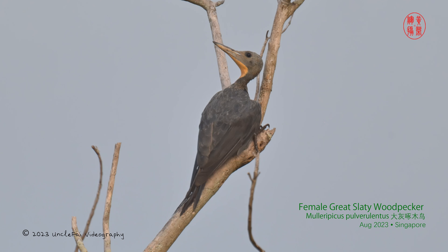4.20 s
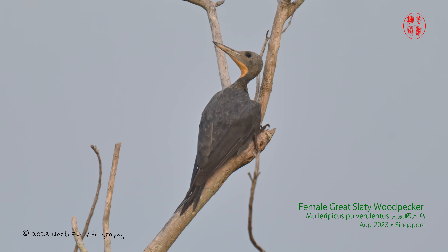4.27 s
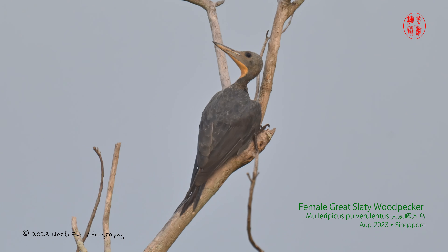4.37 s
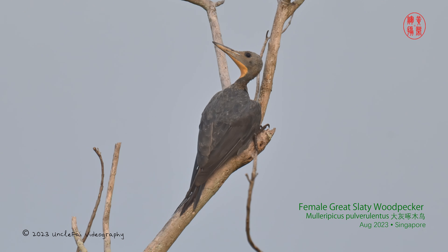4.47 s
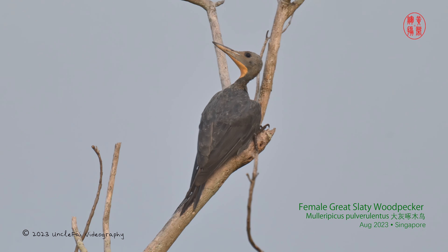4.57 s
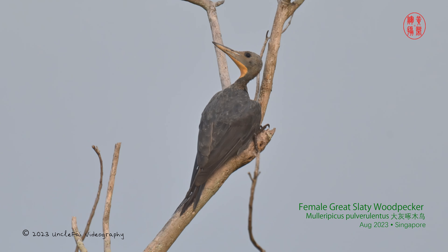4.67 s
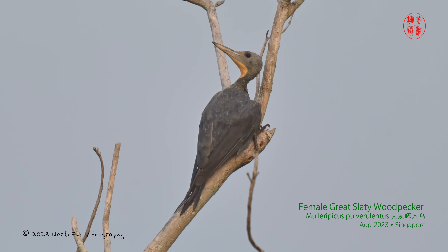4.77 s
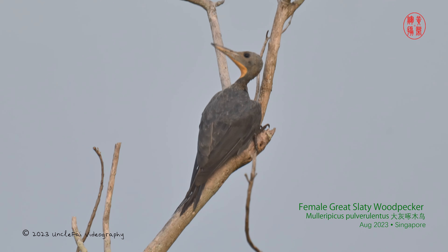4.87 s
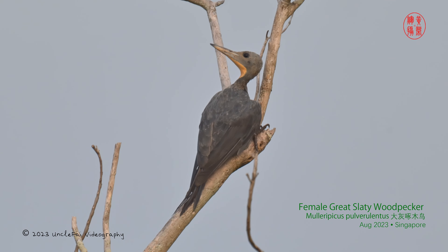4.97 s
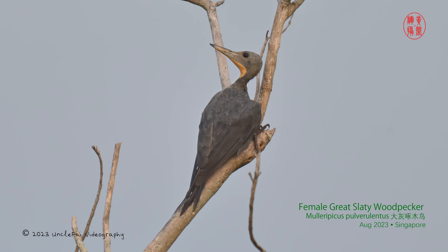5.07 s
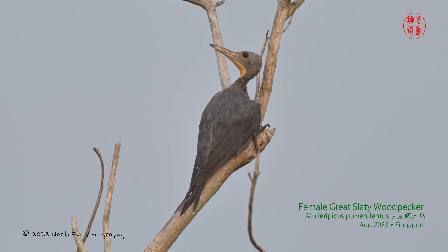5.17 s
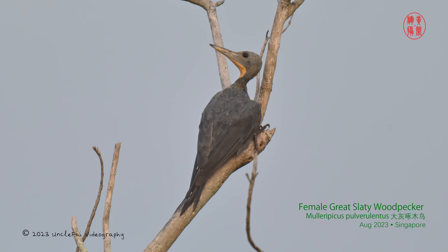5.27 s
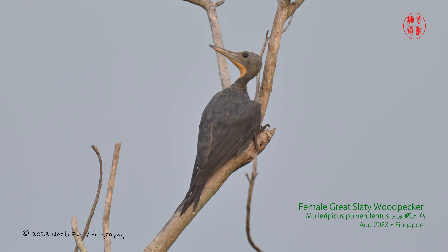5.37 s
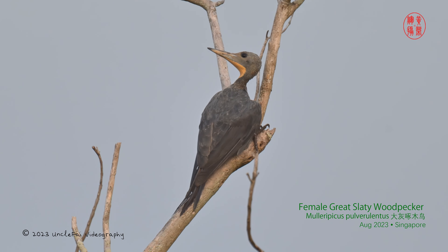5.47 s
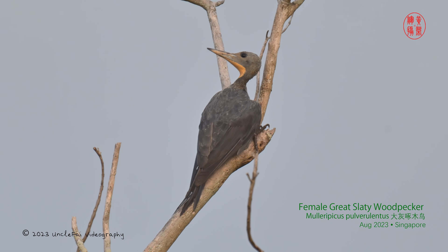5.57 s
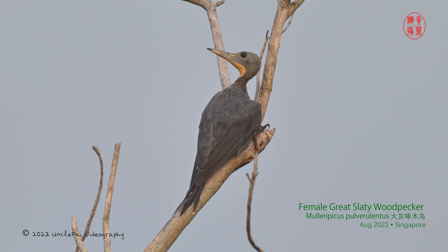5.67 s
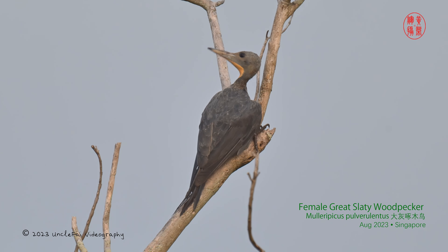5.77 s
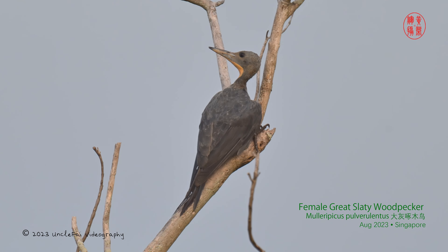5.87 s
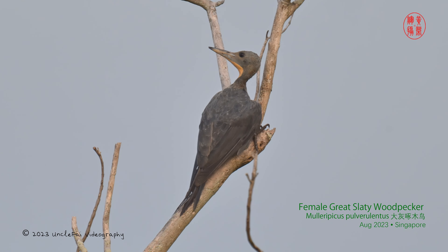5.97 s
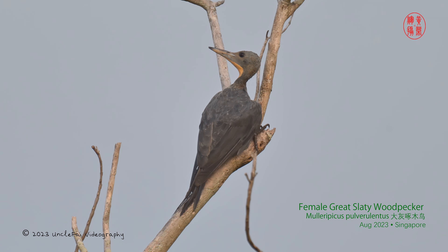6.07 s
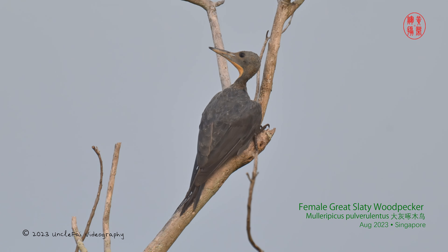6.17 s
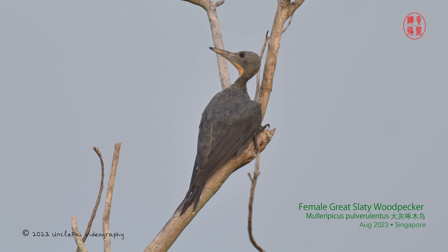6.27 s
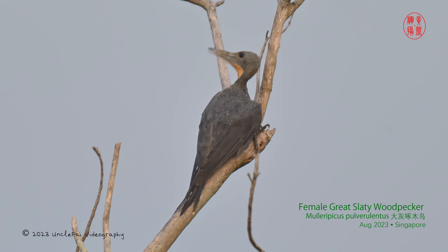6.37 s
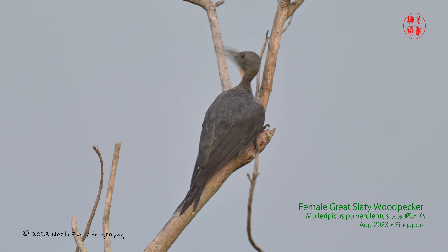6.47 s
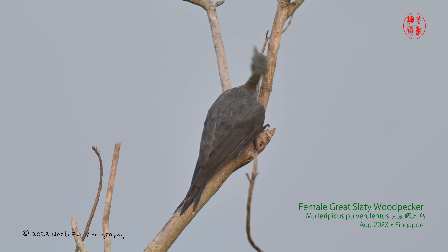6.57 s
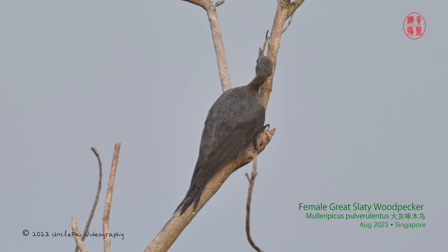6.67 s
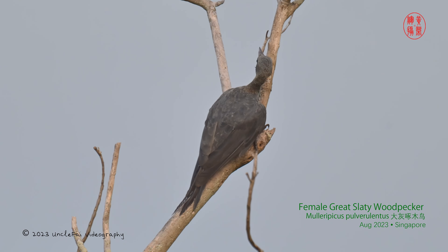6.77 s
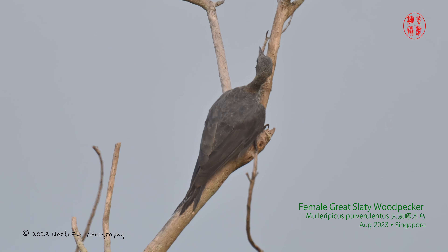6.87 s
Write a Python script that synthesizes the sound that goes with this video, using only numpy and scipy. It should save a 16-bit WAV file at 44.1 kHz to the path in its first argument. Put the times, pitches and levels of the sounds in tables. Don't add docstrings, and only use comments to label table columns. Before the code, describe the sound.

From 0 to 7 seconds, a humid forest edge hums in wide stereo: deep distant traffic rumble, a faint low engine hum, and a thin, high cicada drone in two bands. Katydids make short dry rasps several times a second, brighter on the left, fainter on the right. Leaves rustle in brief flickers, with small drips and twig ticks mostly right of centre, including snaps near 1.5 s. A blurred far call fades at the start. At 1.95-2.35 s a woodpecker gives four quick arched, nasal whinny notes, with a leafy tick among them. Soft distant whistles follow: a falling slur at 2.5 s, a low arch at 4 s, another slur at 5 s. A sharp twig crack comes at 4.17 s, knocks and snaps at 4.66 s. Another blurred call swells near 5.65 s. From 6.56 s four more whinny notes close the scene, trailing a short scattered echo.

```python
import sys
import numpy as np
from scipy import signal
from scipy.io import wavfile
from scipy.ndimage import uniform_filter1d

SR = 44100
rng = np.random.default_rng(int(sys.argv[2]) if len(sys.argv) > 2 else 0)


def wav_record(signal):
    frames = np.transpose(np.atleast_2d(signal))
    bounded = np.clip(frames, -1, 1)
    quanta = np.round(bounded * 32767).astype(np.int16)
    wavfile.write(sys.argv[1], SR, quanta)


def boost(x):
    u = np.asarray(x, float) / 20
    return 10 ** u


N = 305172

PORT_LAG_S = .00013


def evened(x):
    return x / np.sqrt(np.mean(x ** 2) + 1e-20)


def read(points, hz):
    f, value = np.transpose(points)
    return np.interp(np.log(hz + 1), np.log(f + 1), value)


def along(rows):
    s, value = np.transpose(rows)
    return np.interp(np.arange(N) / SR, s, value)


def add(mix, s, sound):
    part = mix[..., round(s * SR):][..., :sound.shape[-1]]
    part += sound[..., :part.shape[-1]]


def slow(count, size):
    once = uniform_filter1d(rng.standard_normal(count), size)
    return evened(uniform_filter1d(once, size))


def swell(peak_s, rise_s, fall_s):
    t = np.arange(N) / SR - peak_s
    return boost(-20 * (t / np.where(t < 0, rise_s, fall_s)) ** 2)


def sides(db):
    return boost([[db / 2], [-db / 2]])


def hiss(shape, same, lag_s, patchy_db):
    frames, hz = N // 256 + 5, np.fft.rfftfreq(1024, 1 / SR)
    a, b, c, d, patches = rng.standard_normal((frames, 513, 5)).T
    patches = uniform_filter1d(patches, size=24, axis=0)
    patches = evened(uniform_filter1d(patches, size=10, axis=1))
    same = np.clip(read(same, hz), -1, 1)[:, None]
    turn = 2 * np.pi * hz * lag_s * hz ** 2 / (hz ** 2 + 800 ** 2)
    right = a + 1j * b
    left = same * right * np.exp(-1j * turn)[:, None] + np.sqrt(1 - same ** 2) * (c + 1j * d)
    z = np.array([left, right]) * boost(read(shape, hz)[:, None] + patchy_db * patches)
    return evened(signal.istft(z, nperseg=1024, noverlap=768)[1][:, :N])


def air():
    # hz, level_db (per Hz)
    wash_colour = [(15, -36), (30, -14), (50, 4), (100, -0.5), (135, -5.5), (165, -15.5), (200, -14.5),
                   (370, -11.5), (600, -17), (950, -18), (1250, -25.5), (2000, -32), (3000, -34),
                   (4500, -29), (7500, -57)]
    # hz, likeness (share)
    wash_likeness = [(100, 1), (300, 1), (500, 0.99), (800, 0.92), (1100, 0.79), (1900, 0.36), (3500, 0.43),
                     (6000, 0.17)]
    hum_hz = 73.4 + .8 * slow(N, size=9000)
    hum = np.sin(2 * np.pi * np.cumsum(hum_hz) / SR) * (1 + .3 * slow(N, size=5000))
    wash_gain = boost(-43.5 + 0.13 * slow(N, size=8000))
    return wash_gain * hiss(wash_colour, wash_likeness, PORT_LAG_S, patchy_db=0.79) + boost(-50) * hum


def choir(shape, loudness, throbs, same, balance_db):
    beat = np.zeros(N)
    for hz, depth, wander_hz in throbs:
        beat += depth * np.sin(2 * np.pi * np.cumsum(hz + wander_hz * slow(N, size=3000)) / SR)
    drone = hiss(shape, [(1, same), (2, same)], lag_s=PORT_LAG_S, patchy_db=0.5)
    return boost(along(loudness)) * sides(balance_db) * evened(drone * (1 + np.clip(beat, -.9, 2)))


def cicadas():
    # hz, level_db
    low_colour, high_colour = [(4000, -89), (6000, -38), (6400, -26.5), (6750, -12.5), (7000, 0),
                               (7250, -3), (7440, 2), (7670, 1), (7850, -6), (8100, -7), (8450, -22),
                               (9500, -19.5), (12000, -83)], [(5000, -74), (8500, -18), (8750, -7.5), (9020, 0.5),
                                                  (9480, 4), (10000, -1), (11300, -17), (12800, -45),
                                                  (15800, -21)]
    # time_s, level_db
    low_loudness, high_loudness = [(0, -35.5), (7, -36)], [(0, -48.5), (1, -49), (2, -48.5), (2.6, -50),
                                                         (3.2, -47), (3.5, -50), (4.2, -47), (4.7, -51),
                                                         (5.3, -47), (5.8, -48.5), (7, -47.5)]
    # rate_hz, depth (share), wander_hz
    low_throbs, high_throbs = [(10.81, 0.072, 1.7), (69.3, 0.12, 9.75), (100, 0.04, 4.1), (151, 0.027, 2.7)], [(82, 0.21, 2.4), (175, 0.04, 5.1)]
    low = choir(low_colour, low_loudness, low_throbs, same=0.21, balance_db=0.8)
    high = choir(high_colour, high_loudness, high_throbs, same=0.12, balance_db=6.0)
    return boost(1.5) * (low + high)


def katydid(phrases, stroke_s, wing, lag_s, balance_db):
    strokes, stroke = np.zeros(N), signal.windows.hann(round(.025 * SR))
    for first, last, db in phrases:
        for s in np.arange(last, first, -stroke_s):
            stroke_db = db + 4.5 - 6.0 * np.exp(-(s - first) / 0.025)
            add(strokes, max(s - len(stroke) / SR / 2, 0), boost(stroke_db) * stroke)
    rasp = hiss(wing, [(1, .5), (2, .5)], lag_s, patchy_db=.7)
    return strokes * rasp * sides(balance_db)


def katydids():
    # first_stroke_s, last_stroke_s, level_db
    calls = [(0, .018, -52), (.2, .282, -52), (.5, 0.594, -49), (0.778, 0.826, -49), (1.03, 1.11, -52),
             (1.48, 1.533, -50), (2.39, 2.488, -56), (2.69, 2.748, -54), (2.9, 3.008, -53),
             (3.16, 3.242, -53), (3.4, 3.453, -51), (3.6, 3.706, -55), (3.84, 3.944, -52),
             (4.17, 4.273, -52), (4.41, 4.513, -51), (4.66, 4.744, -50), (4.88, 4.96, -51),
             (5.13, 5.207, -53), (5.43, 5.482, -51), (5.74, 5.792, -52), (6.362, 6.463, -51),
             (6.748, 6.795, -50)]
    # first_stroke_s, last_stroke_s
    answers = [(.08, .191), (.27, .374), (.7, .808), (.92, 1.03), (1.16, 1.272), (1.4, 1.506),
               (1.64, 1.749), (1.885, 1.991), (2.11, 2.216), (2.335, 2.442), (2.545, 2.652), (2.76, 2.864),
               (3.035, 3.14), (3.25, 3.356), (3.51, 3.616), (3.77, 3.875), (4.065, 4.173), (4.29, 4.393),
               (4.51, 4.588), (4.76, 4.843), (5.02, 5.106), (5.235, 5.319), (5.545, 5.629), (5.79, 5.87),
               (5.98, 6.032), (6.65, 6.7)]
    # hz, level_db
    call_wing, answer_wing = [(5000, -80), (8500, -30), (10000, -1), (11000, 0), (12000, -4), (13000, -8),
                              (14500, -7), (16000, -8)], [(5000, -80), (10000, -30), (11500, -5), (13000, -1), (14200, 0),
                                            (16000, -7)]
    answers = [(*span, -61) for span in answers]
    left = katydid(calls, .0235, call_wing, -PORT_LAG_S, balance_db=4)
    return left + katydid(answers, .0253, answer_wing, PORT_LAG_S, balance_db=-14)


def rustle():
    # peak_s, reach_s, bright_db, dull_db
    stirs = [(.24, 0.15, -56, -51.5), (.37, 0.14, -54, -51), (.69, .14, -60, -54), (.88, 0.16, -56, -50),
             (1.26, 0.2, -61, -60.5), (1.38, 0.065, -55, -49.5), (1.52, 0.21, -52, -50),
             (2.2, 0.26, -62, -52.5), (2.42, .18, -60, -56), (2.8, 0.26, -60, -57), (3.13, 0.9, -57, -53.5),
             (3.6, 0.16, -52.5, -52), (3.87, 0.3, -55, -53), (4.12, 0.22, -70, -55.5),
             (4.43, 0.24, -49.5, -51.5), (4.7, 0.37, -57, -53.5), (5.28, 0.5, -56, -56),
             (5.7, 0.22, -69, -58), (5.87, 0.34, -56, -52.5), (6.12, 0.2, -56, -51.5),
             (6.38, 0.32, -59, -56), (6.73, .17, -52.5, -48.5), (6.92, .2, -58, -50)]
    # hz, level_db
    bright_colour, dull_colour = [(5000, -80), (8500, -30), (10000, -8), (11500, 4.5), (12500, -3),
                                  (13500, -6.5), (16000, -16)], [(200, -68), (700, 7.5), (1500, 14.5), (2500, 12.5),
                                                  (4000, 15), (6000, 12), (8000, 10), (10000, -22),
                                                  (16000, -60)]
    crackle = boost(1.6 * slow(N, size=120))
    power = boost([[-61.5], [-74]]) ** 2 * np.ones((2, N))
    for s, reach, bright_db, dull_db in stirs:
        power += (boost([[bright_db], [dull_db]]) * swell(s, reach, reach)) ** 2
    loudness = np.sqrt(power)
    bright = loudness[0] * hiss(bright_colour, [(1, .4), (2, .4)], PORT_LAG_S, patchy_db=.6) * sides(-9)
    dull = loudness[1] * hiss(dull_colour, [(1000, .7), (3000, .65)], PORT_LAG_S, patchy_db=1.2) * sides(-3)
    return crackle * (bright + dull)


def ticks():
    # time_s, level_db, centre_hz, left_right_db
    drips = [
        (.215, -49, 730, 0),
        (1.6, -46, 1060, -9),
        (3.6, -51, 1700, -5),
        (4.82, -43, 625, -3),
    ]
    knocks = [
        (.877, -41, 1210, -12),
        (.897, -43, 600, -1),
        (4.664, -39, 900, -4),
        (4.689, -41.5, 1000, -10),
    ]
    snaps = [
        (1.486, -47, 4000, -11),
        (1.52, -39, 5350, -19),
        (1.52, -41.5, 2650, -21),
        (1.545, -60, 4500, -4),
        (3.613, -38, 6000, -13),
        (4.664, -38, 5300, -7),
    ]
    cracks = [
        (2.191, -32, 450, 0),
        (4.1655, -22, 7500, -7),
        (4.1655, -32, 5500, -2),
        (4.1655, -36, 2700, 0),
        (4.1655, -41, 1600, 0),
    ]
    sprays = [
        (1.486, -37, 11500, -8),
        (2.192, -26.5, 10700, -14),
        (3.613, -37, 11300, -20),
        (4.665, -28.5, 11300, -18),
        (4.689, -34, 11500, -9.5),
    ]
    # ticks, ring width (share of the centre), t60_s
    kinds = [(drips, .12, .05), (knocks, .9, .022), (snaps, .6, .018), (cracks, .6, .009), (sprays, .3, .065)]
    out, t = np.zeros((2, N)), np.arange(3000) / SR
    for rows, ring_width, t60 in kinds:
        for s, db, hz, pan_db in rows:
            puff = rng.standard_normal(3000) * boost(-60 * t / t60)
            pole = np.exp((2j - ring_width) * hz * np.pi / SR)
            once = signal.lfilter([1], [1, -pole], puff)
            ring = signal.lfilter([1], [1, -pole], once).real
            add(out, s, boost(db + 1.0) * ring / abs(ring).max() * sides(pan_db))
    return out


def blurred_calls():
    # peak_s, level_db, rise_s, fall_s
    swells = [
        (.08, -54.5, 0.32, 0.18),
        (2.4, -52, 0.16, 0.36),
        (5.65, -52.5, 0.28, 0.21),
    ]
    # hz, level_db
    call_colour = [(600, -80), (1150, -40), (1400, 1), (1600, -7), (1750, 2), (1950, -9), (2300, -9.5),
                   (2700, -36), (5000, -80)]
    loudness = sum(boost(db) * swell(s, rise, fall) for s, db, rise, fall in swells)
    return loudness * hiss(call_colour, [(1, .5), (2, .5)], 0, patchy_db=1.2) * sides(-3.5)


def whistles():
    # start_s, level_db
    slurs = [
        (2.527, -54),
        (5.012, -54),
    ]
    slur_end_hz, slur_top_hz = 1400, 2870
    u = np.linspace(0, 1, round(.21 * SR))
    sink = (1 - u ** 1.45) ** 2.6
    for start, db in slurs:
        yield start, slur_end_hz + (slur_top_hz - slur_end_hz) * sink, db - 27 * (sink + u ** 10), -25
    arch_low_hz, arch_top_hz = 1260, 1512
    arch = abs(np.sin(np.pi * np.linspace(0, 1, round(.33 * SR)) ** .72)) ** .5
    yield 3.985, arch_low_hz + (arch_top_hz - arch_low_hz) * arch, -59.5 - 6 * (1 - arch), 8.5


def whistlers():
    out = np.zeros(N)
    for start, hz, db, octave_db in whistles():
        turns = np.cumsum(hz) / SR
        tone = np.sin(2 * np.pi * turns) + boost(octave_db) * np.sin(4 * np.pi * turns)
        flutter_db = .9 * slow(len(hz), size=300)
        add(out, start, np.sqrt(2) * boost(db + flutter_db) * tone * signal.windows.tukey(len(hz), .1))
    return np.array([out, np.roll(out, 7)]) * boost([[5.5], [-1.5]])


def forest(x, t60):
    t = np.arange(SR) / SR
    tail = rng.standard_normal((2, SR)) * boost(-60 * t / t60) * np.minimum(t / 0.0079, 1)
    return signal.fftconvolve(x[None], tail / np.linalg.norm(tail[0]), axes=1)[:, :N]


def note(shelf_s, climb_s, top_hz, first):
    attack_s, attack_db, crest_s, fall_s = 0.01074, -12.5, 0.0092, .023
    if first:
        lead_hz = 1575
        rise = [(0, lead_hz, attack_db),
                (attack_s, lead_hz, 0),
                (shelf_s, lead_hz + 94, 0),
                ((shelf_s + climb_s) / 2, lead_hz + .62 * (top_hz - lead_hz), 0)]
        top_db, crest_db, end_db = -5, -5, -3
    else:
        shelf_hz = 1397
        rise = [(0, 1128, attack_db),
                (min(attack_s, shelf_s), shelf_hz, -1),
                (shelf_s, shelf_hz + 45, -3.5),
                (shelf_s + 0.00568, 1745, 0)]
        top_db, crest_db, end_db = 0, -6, -11.5
    return rise + [(climb_s, top_hz, top_db),
                   (climb_s + crest_s, 0.96 * top_hz, crest_db),
                   (climb_s + crest_s + fall_s, .59 * top_hz, end_db)]


def curve(rows, size):
    s, *columns = np.transpose(rows)
    t = np.arange(s[0], s[-1], 1 / SR)
    return [uniform_filter1d(np.interp(t, s, c), size, mode="nearest") for c in columns]


def woodpecker():
    # start_s, shelf_end_s, climb_end_s (both after the start), top_hz, effort_db
    runs = [
        [(1.946, .022, 0.049, 2266, -43), (2.047, .019, 0.049, 2246, -37.5), (2.157, .021, .042, 2173, -37.5),
         (2.285, .022, .041, 2050, -38.5)],
        [(6.558, 0.022, 0.054, 2330, -43), (6.667, 0.014, .045, 2300, -39.5), (6.777, .02, 0.044, 2060, -38.5),
         (6.898, 0.021, 0.032, 2000, -38)],
    ]
    # hz, level_db
    bill = [(1000, -9.5), (1450, 2.5), (1620, -2), (1900, 2), (2280, -6), (2900, -16), (3500, -7),
            (4300, -2.5), (4700, 4.5), (5400, 3), (6200, -7.5), (7500, -13), (8500, -22), (9500, -45)]
    overtones_db = [1, -2, -4.5, -11]
    out = np.zeros(N)
    for run in runs:
        for place, (start, shelf_s, climb_s, top_hz, db) in enumerate(run):
            hz, effort_db = curve(note(shelf_s, climb_s, top_hz, place == 0), size=200)
            turns = np.cumsum(hz * (1 + 0.0032 * slow(len(hz), size=60))) / SR
            tone = np.zeros(len(hz))
            for k, over_db in enumerate(overtones_db, 1):
                shimmer_db = 1.02 * k * slow(len(hz), size=150)
                tone += boost(over_db + read(bill, k * hz) + shimmer_db) * np.sin(2 * np.pi * k * turns)
            fade = signal.windows.tukey(len(hz), .12)
            add(out, start, np.sqrt(2) * boost(db + effort_db) * tone * fade)
    return out


def scene():
    bird, far = woodpecker(), whistlers()
    birds = bird * sides(-.4) + forest(boost(-10.5) * bird, t60=0.38)
    birds += far + forest(boost(-10) * far[0], t60=1.7)
    return air() + cicadas() + katydids() + rustle() + ticks() + blurred_calls() + birds


def top_cut(x):
    return signal.sosfilt(signal.butter(12, 15780, fs=SR, output="sos"), x)


def record(dry):
    low_pass = signal.firwin(801, 15780, window=("kaiser", 9), fs=SR)
    limited = signal.oaconvolve(dry, low_pass[None], "same")
    return top_cut(limited)


dry = scene()
out = record(dry)
wav_record(out)
```